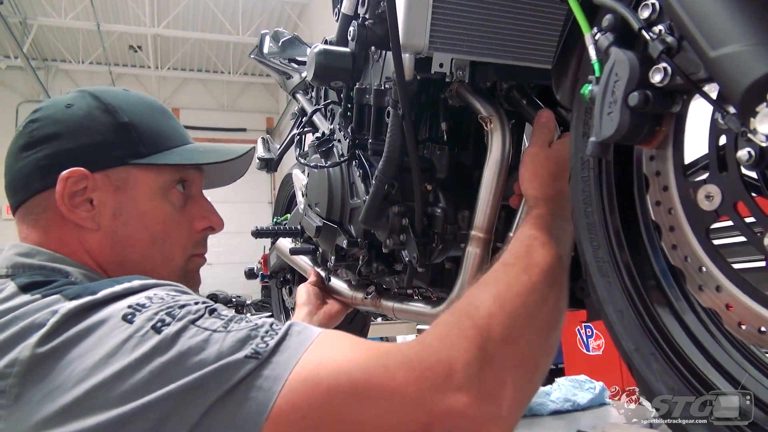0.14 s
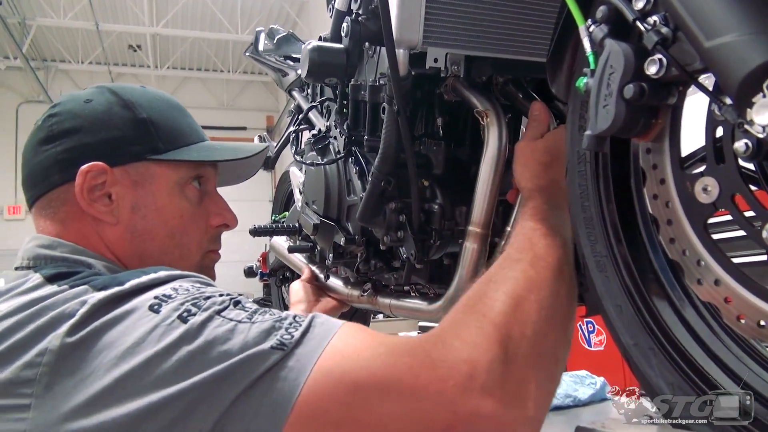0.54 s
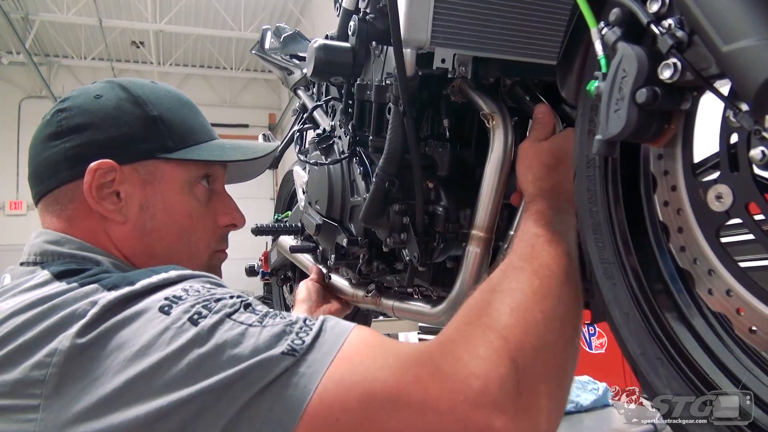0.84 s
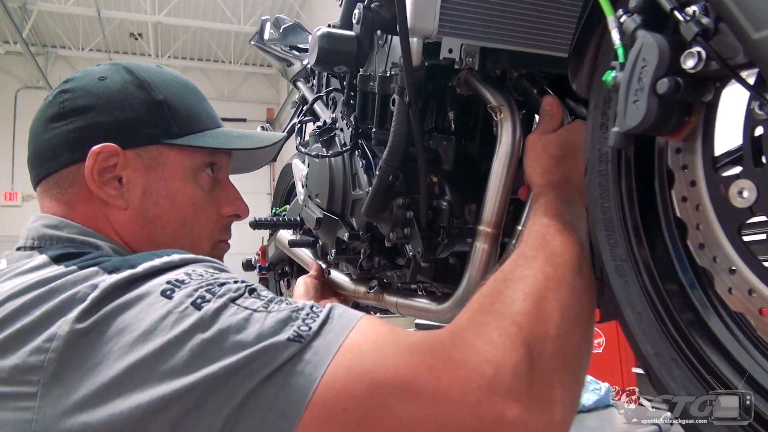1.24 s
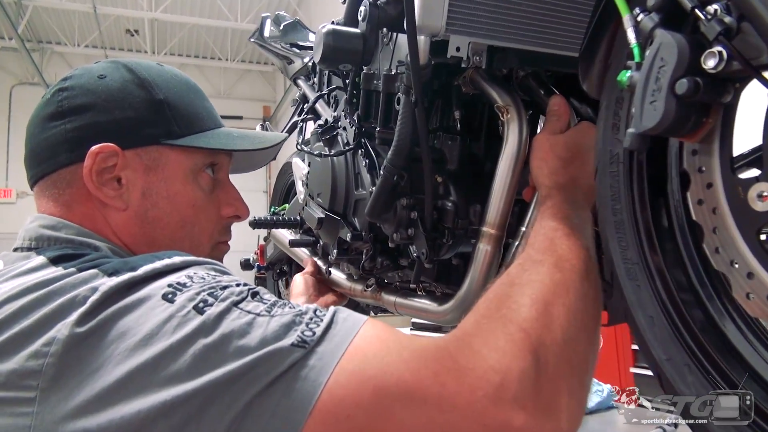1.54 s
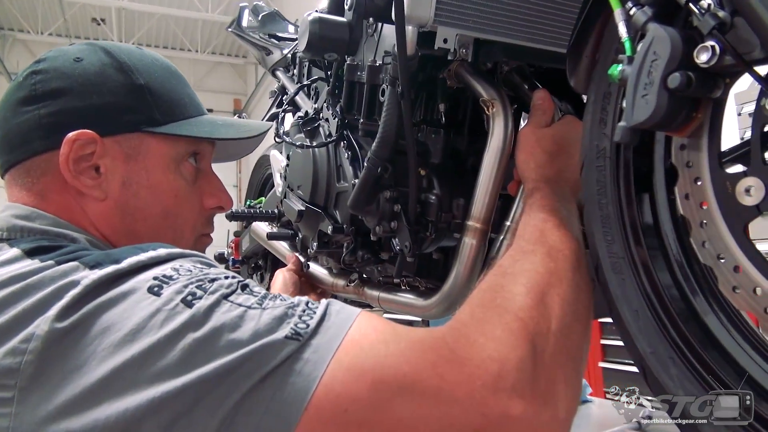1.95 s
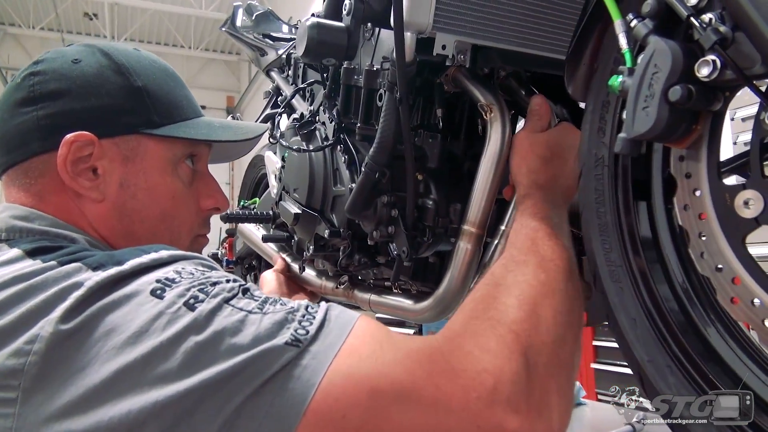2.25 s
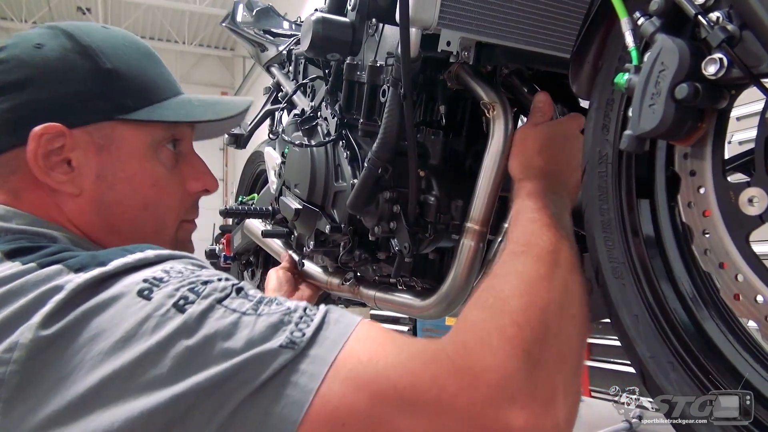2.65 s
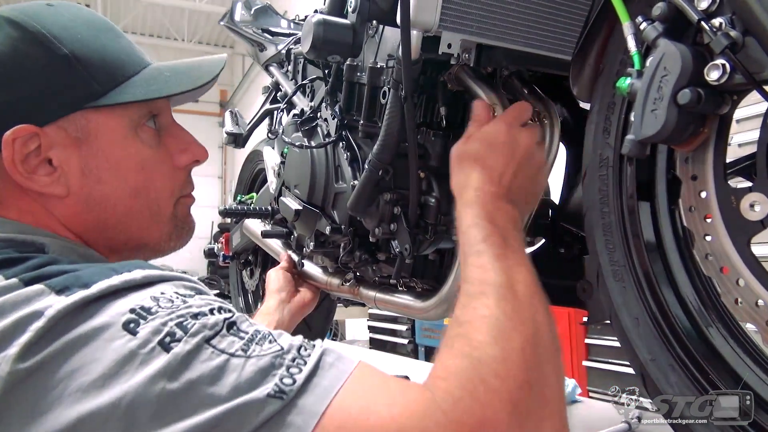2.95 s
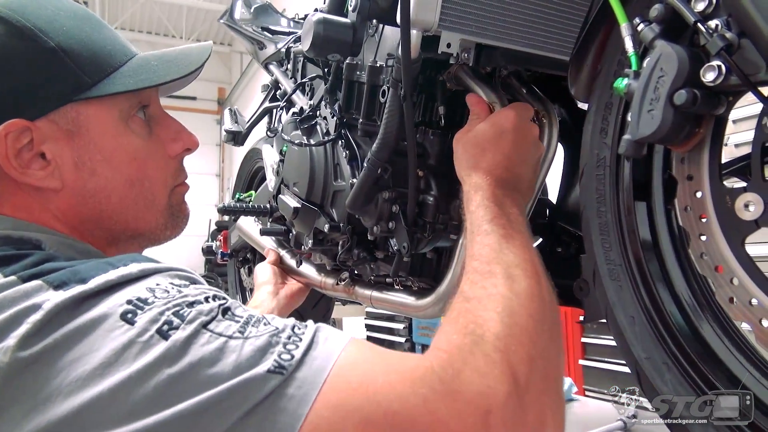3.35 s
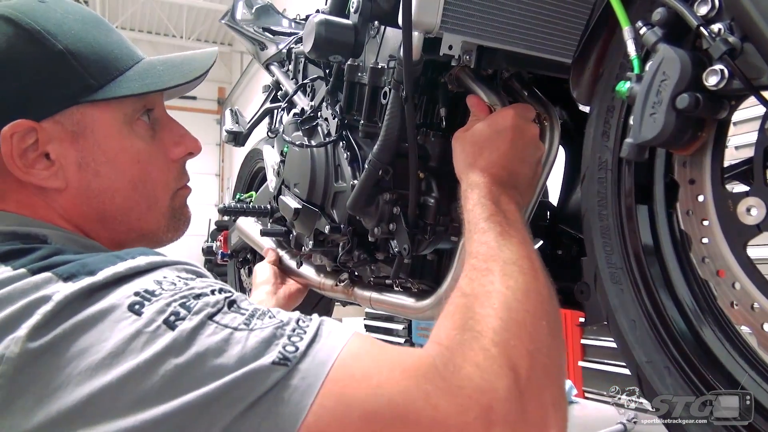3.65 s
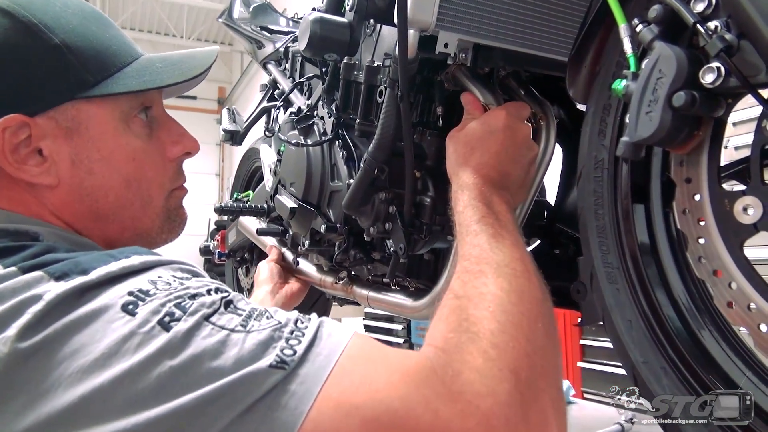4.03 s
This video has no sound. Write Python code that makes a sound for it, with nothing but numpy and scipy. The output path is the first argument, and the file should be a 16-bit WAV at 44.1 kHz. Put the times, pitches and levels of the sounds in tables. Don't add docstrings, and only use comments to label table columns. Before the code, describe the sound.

A thin steel exhaust pipe is worked by hand against a motorcycle in a large, hard workshop. Low fan hum and a broad wash of air run throughout, gradually quieter. A bright, hollow clink comes at 0.4 s, with small scuffs after it, then stronger knocks at 0.9 and 1.2 s. Each close ring is cut short by the grip, but the hall holds a shimmering tail for about a second. Around 1.65 s there is a short gritty scrape and a light tap, then a duller tap at 1.9. A sharp clank at 2.4 leaves a thin singing tone; a scuff follows at 2.6 and tiny hook clicks and spring pings near 2.75-3.0. A hard knock lands at 3.5, then faint clicks, and a soft settling tap at 4.1. The background ducks after the knocks at 1.2 and 3.5 and creeps back. Nearly mono, slightly saturated.

```python
import sys
import numpy as np
from scipy import signal
from scipy.fft import rfft, irfft
from scipy.io import wavfile
from scipy.ndimage import uniform_filter1d

SR = 44100
rng = np.random.default_rng(int(sys.argv[2]) if len(sys.argv) > 2 else 0)


def invert_db(level):
    return 10 ** (np.asarray(level, dtype=float) / 20)


def generate_wav(signal):
    frames = np.transpose(np.atleast_2d(signal))
    scaled = np.clip(frames, -1, 1) * 32767
    pcm = np.round(scaled).astype(np.int16)
    wavfile.write(sys.argv[1], SR, pcm)


N = 184635

# start in seconds, blow level in dB, treble in dB, hall level in dB,
# contact time in seconds.
FLANGE_KNOCKS = [
    (.402, -12, -1.5, -14.5, 0.002),
]
STUD_KNOCKS = [
    (.8738, -8.5, -0.085, -16, 0.00133),
]
PORT_KNOCKS = [
    (1.240, -8.5, 0.23, -14.5, 0.00178),
]
LIGHT_TAPS = [
    (1.670, -23.5, -5.5, -14.5, 0.0016),
    (1.884, -24.5, -8, -15, 0.0025),
]
SPRING_KNOCKS = [
    (2.395, -10.5, 1.9, -10.5, 0.00214),
]
BRACKET_KNOCKS = [
    (3.5349, -10.5, 0.18, -12, 0.00201),
]
SETTLING_KNOCKS = [
    (4.1278, -25.5, -5, -9.5, 0.00185),
]

# pitch in Hz, level in dB, time to fall by 60 dB in seconds.
FLANGE_MODES = [(391, -5.5, 0.0388), (533.7, -11, 0.06), (1365.2, -2.5, 0.066), (1485.5, 0.5, 0.0547),
                (1706, -2, 0.025), (2242, -30.5, .063), (2670, -16.5, .063), (2990, 0.5, 0.0336),
                (3268, 0, 0.06), (3490, -7, .03), (3982, -24.5, .063), (4823, -19, 0.058),
                (4894, -13.5, 0.066), (5400, -6.5, 0.0088)]
STUD_MODES = [(374, -7, 0.0458), (537.4, -9.5, 0.051), (1357.3, -3, 0.0754), (1456, -7, 0.097),
              (1679, 6, 0.019), (2986, 2, 0.02), (3213, -12, 0.075), (3284, -5, 0.0826), (3464, -8, 0.051),
              (3900, -10, 0.028), (5100, -14, 0.047), (5430, -31.5, .25), (5810, -9.5, 0.0135)]
PORT_MODES = [(403, -4.5, 0.0292), (508, -11, 0.053), (1372.8, -4, 0.0765), (1467.5, -8, 0.055),
              (1658, 4, 0.0182), (2680, -27.5, 0.059), (2811, -9.5, 0.045), (2964.5, -1, 0.0215),
              (3273, -3.15, 0.0596), (3435, -2.5, 0.0208), (4010, -24, 0.045), (4960, -10.5, 0.036),
              (5306, -32, 0.22), (5474, -12.5, 0.0099)]
LIGHT_MODES = [(370, -6.5, 0.05), (542.7, -6, 0.045), (1378.7, -3.5, 0.063), (1487, 0.5, 0.094),
               (1800, -16.5, 0.064), (2806, -4, 0.0435), (3012, -2.5, 0.038), (3330, -7.5, 0.035),
               (3670, -21.5, 0.059), (4920, -3.5, 0.0225), (5537, -22.5, 0.061), (5540, -21, .15)]
SPRING_MODES = [(392.2, -4.5, 0.0567), (532.2, -10, 0.0347), (1417.3, 1.5, 0.044), (1764, -10.5, 0.042),
                (2046, -24, 0.073), (2633, -4, 0.0725), (2943, -1.5, 0.049), (2921, -0.5, 0.054),
                (3380, 6, 0.0098), (3905, -9, 0.0417), (4312, -18, 0.14), (4811, -7.5, 0.0265),
                (5643, -10, 0.0172), (6620, -9.5, 0.022)]
BRACKET_MODES = [(414, -10.5, 0.038), (525.6, -10, 0.045), (1395.7, -6, 0.057), (1500, -2.5, 0.0362),
                 (2016, -15, 0.037), (2790, -5, 0.035), (2970, -6.5, 0.057), (3357, -8.5, 0.0363),
                 (3600, -2.5, 0.0152), (4724, -19.5, 0.168), (5190, -23, 0.069), (5605, -15.5, 0.036)]
SETTLING_MODES = [(397.7, -5.5, 0.099), (550, -13.5, 0.108), (1422, 3.5, 0.0447), (1753, -3.5, 0.031),
                  (2069, -19.5, 0.24), (2654, 1.5, 0.042), (2840, -10.5, 0.18), (3245, -7.5, 0.055),
                  (4177, -20.5, 0.065), (4285, -7, 0.012), (4678, -31, 0.24), (4877, -24.5, 0.17),
                  (5675, -16, 0.081)]

# pitch in Hz, level in dB, time to fall by 60 dB in seconds.
HEADER_HIGH = [(6516, -26.5, 0.021), (7445, -18, 0.059), (7472, -8.5, 0.0214), (8385, -25.5, 0.059),
               (8600, -27, 0.057), (8640, -24.5, 0.033), (9520, -16.5, .035), (10800, -26, 0.034),
               (11550, -19, 0.0264), (12460, -19, 0.036), (13450, -32, 0.016), (13760, -13, 0.0155),
               (15100, -30.5, .03)]
PORT_HIGH = [(6842, -24.5, 0.042), (7370, 1.5, 0.0195), (8560, -23.5, 0.056), (9660, -13, 0.049),
             (10300, -28.5, 0.039), (10840, -18, 0.05), (11270, -18.5, 0.05), (12000, -23, 0.058),
             (12440, -30, 0.066), (12940, -35, 0.087), (13400, -15, 0.027), (13880, -28, 0.056),
             (14580, -19.5, 0.025)]
SPRING_HIGH = [(7350, -18.5, 0.21), (7580, -10.5, 0.077), (7987, -7.5, 0.048), (8153, -4, 0.057),
               (8527, -9, 0.095), (8750, -0.5, 0.0215), (9480, -13.5, 0.11), (9884, -16.5, 0.051),
               (10630, -19, 0.096), (11560, -20.5, 0.12), (12200, -11, 0.1), (12500, -14.5, 0.038),
               (13100, -5, 0.045)]
BRACKET_HIGH = [(6040, -20, 0.048), (6295, -11, 0.026), (7079, -29.5, 0.065), (7470, -11, 0.036),
                (8285, -22, 0.064), (8490, -13, 0.05), (9700, -7.5, 0.034), (10070, -21.5, 0.041),
                (10820, -20.5, 0.044), (11600, 1.5, 0.0109), (11800, -13.5, 0.048), (13230, -16.5, 0.045),
                (14570, -27.5, 0.069)]
JOINT_HIGH = [(6840, -22.5, 0.036), (7410, -9, 0.0253), (8250, -21.5, 0.069), (8540, -25, 0.044),
              (8772, -13.5, 0.0098), (9540, -21, 0.052), (9590, -15.5, 0.016), (10600, -22, 0.042),
              (11440, -9, 0.0126), (12240, -14, .035), (12800, -18, 0.042), (14450, -30, .03)]

# pitch in Hz, width in Hz, level in dB.
FLANGE_FAR = [(378, 78, -3), (522, 60, -7.5), (1400, 60, -6), (1490, 60, -4), (1717, 253, -13),
              (2630, 34, -16.5), (2898, 130, -2.5), (3296, 238, -6), (3757, 97, -14), (4030, 117, -20),
              (4430, 41, -20.5), (4838, 49, -5.5), (5020, 195, -17), (5388, 37, -12.5), (7380, 95, -24.5)]
STUD_FAR = [(390, 86, -8), (561, 107, -10), (1356, 87, -6.5), (1501, 42, -1.5), (1676, 78, -7.5),
            (1845, 33, -12.5), (2856, 112.5, -2.2), (3260, 280, -6), (3723, 73, -15.5), (3977, 107, -14),
            (4300, 44, -22), (4852, 186, -13), (5462, 45, -15.5), (7377, 96, -19.5)]
PORT_FAR = [(408, 93, -10.5), (556, 54, -11.5), (1378.4, 53.4, -2), (1500.7, 37.3, -3.5),
            (1666, 245, -14.5), (2908, 125, -2.5), (3250, 190, -12.5), (3364, 225, -8), (3943, 163, -15),
            (4390, 51, -30), (4928, 159, -13.5), (5500, 200, -22), (5990, 97, -26.5), (7416, 92, -24.5)]
LIGHT_FAR = [(404, 167, -7.5), (557, 60, -9), (1370, 78, -6), (1500, 87, -3), (1700, 220, -13.5),
             (2471, 31.6, -7), (2752, 99, -2.5), (2935, 113, -2.5), (3276, 232, -10), (3790, 140, -18.5),
             (4786, 174, -9.5), (5540, 31, -7)]
SPRING_FAR = [(407.5, 111, -8), (1432, 246, -10), (1600, 31, -15), (2667, 67.5, -2.5), (2815, 71.3, 0),
              (3245, 30, -8), (3178, 350, -16), (3754, 270, -16.5), (4193, 47.4, -11.5), (4710, 24, -18),
              (4826, 178, -20), (5600, 183, -23), (6000, 39, -26), (8533, 48, -38)]
BRACKET_FAR = [(409.5, 70, -7.5), (537.3, 50, -8), (1400.5, 27.8, -3.5), (1551.4, 143, -5),
               (2907, 155.3, -2.15), (3389, 97, -8.5), (3792, 210, -16), (4353, 88, -23.5),
               (4689, 43.6, -12), (5000, 155, -17.9), (5588, 37.5, -13.5), (5720, 34, -19.5),
               (7371, 46, -28.5), (7587, 88, -28.5)]

# pitch in Hz, width in Hz, level in dB.
HEADER_HIGH_FAR = [(5900, 192, -25), (6420, 113, -28.5), (7680, 210, -27), (8450, 136, -30),
                   (9480, 79, -29), (10750, 102, -30.5), (11960, 87, -29.5), (12380, 250, -35),
                   (13500, 250, -38), (14800, 110, -42)]
PORT_HIGH_FAR = [(6480, 37, -1), (6870, 41, -11), (7430, 140, -3), (7840, 184, -10), (8380, 53, -5.5),
                 (9480, 65, -6.5), (10850, 67, -8), (11500, 52, -6.5), (12100, 81, -12), (12400, 300, -12),
                 (13400, 38, -14.5), (13900, 160, -15.5), (14560, 140, -14)]
SPRING_HIGH_FAR = [(6585, 130, -2), (7050, 46, -8), (7370, 82, 0), (8270, 48, 2), (8450, 28, -1.5),
                   (8900, 38, -7.5), (9470, 31, 0.5), (10600, 74, -14), (10900, 100, -13.5),
                   (11500, 70, -12), (12200, 42, -5), (13200, 69, -14), (14600, 34, -16.5)]
BRACKET_HIGH_FAR = [(6530, 97, -4), (7050, 87, -9.5), (7400, 46, -3.5), (7620, 52, -2), (8310, 41, -8),
                    (8440, 56, 1.5), (9470, 51, -4), (10030, 72, -11.5), (10800, 59, -7), (11500, 85, -8.5),
                    (12270, 320, -8.5), (13200, 58, -8.5), (14500, 55, -16)]
# pitch in Hz, width in Hz, level in dB.
HAZE = [(7500, 4000, -42), (11500, 4000, -45)]

# pitch in Hz, level in dB.
BETWEEN = [(120, -15.5), (250, -13.5), (700, -26.5), (2100, -24.5), (4300, -39), (9000, -38.5),
           (12000, -49), (15500, -60.5)]
# pitch in Hz, level in dB.
CRACK = [(100, -25.5), (250, -20), (900, -24), (2000, -21), (4000, -26), (8000, -32.5), (15000, -42),
         (16500, -65)]
# pitch in Hz, time to fall by 60 dB in seconds.
HALL_T60 = [(200, 0.82), (500, 0.95), (1400, 1.317), (3000, 1.395), (6000, 1.188), (10000, 0.763),
            (15000, 0.45)]

# pitch in Hz, level in dB per Hz.
WASH = [(12, -32), (24, -2), (102, -8), (342, -17), (1390, -22.5), (1700, -28.5), (3500, -26),
        (4930, -37.5)]
# pitch in Hz, width in Hz, level in dB over the wash.
HUM = [(60.22, 9, -4), (100.76, 8.2, 0), (128.45, 28.3, -7)]
# time in seconds, level in dB.
WASH_DB = [(0, -43), (.9, -42.5), (1.05, -45), (2.3, -47.5), (3.5, -46.5), (4.19, -49.5)]
# start in seconds, depth in dB.
DUCKS = [
    (1.25, 11.5),
    (3.545, 13.5),
]
# pitch in Hz, level in dB.
TRACK_HISS = [(100, -8), (600, -0.5), (1200, -8), (3500, -9.5), (6000, -0.5)]

# start in seconds, peak level in dB, pitch in Hz,
# width in Hz, length in seconds.
SCUFFS = [(.372, -37.5, 1500, 850, 0.0063), (.575, -32, 420, 300, 0.013), (.946, -29, 1680, 120, .014),
          (.965, -28.5, 451, 298, 0.0137), (1.65, -13.5, 1700, 2550, .00086),
          (1.651, -22.5, 3050, 2500, 0.0141), (1.89, -35.5, 232, 120, 0.05),
          (2.137, -42.5, 1187, 90, .0041), (2.364, -36.5, 1110, 900, 0.0183),
          (2.3733, -26, 1190, 1500, 0.0138), (2.374, -33, 3600, 2500, 0.0055),
          (2.641, -26, 1392, 300, 0.0092), (2.642, -40, 800, 500, 0.0152), (2.644, -40, 2300, 1200, 0.0053),
          (3.276, -45, 3270, 300, 0.0062), (3.287, -39, 1623, 150, 0.0042), (3.502, -42, 3600, 900, 0.0136)]
# start in seconds,
# level in dB, pitch in Hz, time to fall by 60 dB in seconds.
SINGING = [(.402, -42, 1490, .9), (.402, -56, 7430, .8), (.874, -40, 1490, .9), (.874, -54, 7410, .8),
           (1.24, -40, 1378, .9), (1.24, -44, 1520, 1.1), (1.24, -48, 7435, .9), (1.24, -55, 9480, .6),
           (2.395, -35, 3243, 1.7), (2.395, -44, 2790, 1.1), (2.395, -55, 8270, .7), (2.395, -57, 9470, .7),
           (3.535, -42, 1545, 1.1), (3.535, -42, 2920, 1.1), (3.535, -54, 8440, .9)]
# start in seconds, peak level in dB, pitch in Hz.
CLICKS = [(.587, -45, 13000), (.62, -42.5, 12000), (1.652, -21.5, 6900), (1.76, -58, 7000),
          (2.912, -52, 9000), (2.923, -50.5, 7000), (2.93, -54, 11000), (2.975, -57, 12000),
          (3.195, -46.5, 8000), (3.797, -51, 9000), (3.903, -53.5, 11000)]
# pitch in Hz, width in Hz, level in dB.
SCRAPE_MODES = [(430, 98, -4), (1130, 300, -8), (1680, 166, -2.5)]
# start in seconds, peak level in dB, pitch in Hz,
# ring time in seconds.
PINGS = [(2.755, -54.5, 8700, 0.032), (2.842, -51.5, 8900, 0.043), (2.851, -60.5, 9150, .03),
         (2.862, -62, 9200, .02), (2.923, -51.5, 7930, 0.074), (2.923, -52, 6130, .07),
         (2.927, -53.5, 9160, 0.054), (2.923, -55, 15400, 0.061), (2.957, -55.5, 8000, 0.061),
         (2.968, -57, 7950, 0.041), (2.97, -59, 14900, .04), (2.972, -60, 10900, 0.031)]

EDGE_HZ = 15760
BODY_DB = -3
HISS_DB, PATCHY_DB = -42.5, 1.4
DUCK_FALL_S, DUCK_RECOVER_S = 0.016, 0.321
WAVER_HZ, WAVER = 9, 0.5
CLICK_WIDTH, CLICK_S = 0.774, 0.00286
SCRAPE_S, SCRAPE_LENGTH_S, SCRAPE_DB, SLIPS_PER_S = 1.627, 0.04, -21, 2300
OVERLOAD = 0.986
TRACK_HISS_DB = -71


def evened(x):
    return x / np.sqrt(np.mean(x ** 2) + 1e-20)


def read(points, hz):
    f, value = np.transpose(points)
    return np.interp(np.log(hz + 1), np.log(f + 1), value)


def add(mix, s, sound):
    part = mix[round(s * SR):][:len(sound)]
    part += sound[:len(part)]


def resonate(x, hz, width):
    pole = np.exp((2j * np.pi * hz - np.pi * width) / SR)
    return 2 * signal.lfilter([1 - abs(pole)], [1, -pole], x).real


def resonate_twice(x, hz, width):
    return resonate(resonate(x, hz, width), hz, width)


def coloured(x, points):
    return irfft(rfft(x) * invert_db(read(points, np.fft.rfftfreq(len(x), 1 / SR))), len(x))


def burst(length_s, size=12000):
    u = np.arange(size) / SR / max(length_s, 1e-3)
    swell = u * np.exp(1 - u) ** 2 * np.exp(-(u / 2.27) ** 2)
    return rng.standard_normal(size) * swell


def lifted(table, db, column):
    return [tuple(v + db * (k == column) for k, v in enumerate(row)) for row in table]


def ducking_db():
    start_s, depth_db = np.transpose(DUCKS)
    after = np.maximum(np.arange(N) / SR - start_s[:, None], 0)
    return -depth_db @ ((1 - np.exp(-after / DUCK_FALL_S)) * np.exp(-after / DUCK_RECOVER_S))


def air_wash():
    frames, hz = N // 512 + 5, np.fft.rfftfreq(2048, 1 / SR)
    a, b, patches = rng.standard_normal((frames, 1025, 3)).T
    patches = uniform_filter1d(patches, 20, 0)
    patches = evened(uniform_filter1d(patches, 6, 1))
    air_db = read(WASH, hz) - 6 * np.log2(np.maximum(hz / 5000, 1))
    level_db = np.maximum(air_db, HISS_DB)[:, None] + PATCHY_DB * patches
    spectrum = (a + 1j * b) * (hz < EDGE_HZ)[:, None] * invert_db(level_db)
    air = signal.istft(spectrum, nperseg=2048, noverlap=1536)[1]
    return evened(air[:N])


def fan_hum():
    return sum(invert_db(db) * evened(resonate_twice(rng.standard_normal(N), hz, width))
               for hz, width, db in HUM)


def background():
    gain_db = np.interp(np.arange(N) / SR, *np.transpose(WASH_DB)) + ducking_db()
    return invert_db(gain_db) * (air_wash() + fan_hum())


def scuff(db, hz, width, length_s):
    sound = resonate_twice(burst(0.5 * length_s), hz, width)
    return invert_db(db) * sound / abs(sound).max()


def blow_tilt(treble_db):
    return [(600, BODY_DB), (900, 0.0097), (4000, 0), (5000, treble_db)]


def wall_ring(modes, tilt, contact_s):
    t = np.arange(12000) / SR
    ring = np.zeros(len(t))
    for k, (hz, db, t60) in enumerate(modes):
        turns = hz * t + 0.5 * k + 0.2 * rng.random()
        ring += invert_db(db + read(tilt, hz) - 60 * t / (1.067 * t60)) * np.sin(2 * np.pi * turns)
    ring *= 1 - np.exp(-(t / max(contact_s, 2e-4)) ** 2)
    ring *= 0.734 + np.exp(-(t / 0.0207) ** 2)
    return ring * np.cos(np.linspace(0, np.pi / 2, len(t))) ** 2


def clink(row, modes):
    _, blow_db, treble_db, _, contact_s = row
    tilt = blow_tilt(treble_db)
    dull = [(5000, 0), (14000, 0.8 * (blow_db + 10))]
    ring = wall_ring(modes, tilt, contact_s)
    crack_curve = [(hz, db + read(tilt, hz) + read(dull, hz)) for hz, db in CRACK]
    crack = coloured(burst(6.65 * contact_s), crack_curve)
    crack = coloured(crack, [(EDGE_HZ - 300, 0), (EDGE_HZ, -30)])
    snap_curve = [(5000, -55.5), (9000, -34 + read(tilt + dull[1:], 8800)),
                  (15500, -36 + read(dull, 15500)), (17000, -61.5)]
    snap = coloured(burst(3 * contact_s), snap_curve)
    sound = ring + invert_db(15.0) * crack + invert_db(17.5) * snap
    return invert_db(blow_db) * sound / sound[:500].std()


def sent_to_hall(row, far):
    _, blow_db, treble_db, hall_db, _ = row
    f = np.fft.rfftfreq(2 * SR, 1 / SR)
    power = sum(invert_db(2 * db) / (1 + (1.3 * (f - hz) / width) ** 2) ** 2 for hz, width, db in far)
    power = power * invert_db(2 * read([(9000, 0), (13000, -3)], f))
    power = (power + invert_db(2 * read(BETWEEN, f))) * (f < EDGE_HZ)
    early_db = 60 * 0.16 / read(HALL_T60, f)
    level_db = blow_db + hall_db + 30 + early_db + read(blow_tilt(treble_db), f)
    return invert_db(level_db) * power ** 0.5


def hall(spectrum):
    noise = irfft(rfft(rng.standard_normal(2 * SR)) * spectrum)
    hz, t, z = signal.stft(noise, SR, nperseg=256)
    fade = invert_db(-60 * t / read(HALL_T60, hz)[:, None])
    tail = signal.istft(z * fade, SR, nperseg=256)[1]
    t = np.arange(len(tail)) / SR
    swell = 1 - np.exp(-(t / 0.00156) ** 2)
    near_walls = 1 + 0.294 * np.exp(-t / 0.167)
    return 0.06935 * tail * swell * near_walls


def knocks():
    header_far = HEADER_HIGH_FAR + HAZE
    port_far = lifted(PORT_HIGH_FAR, -22, column=2) + HAZE
    spring_far = lifted(SPRING_HIGH_FAR, -25.5, column=2) + HAZE
    bracket_far = lifted(BRACKET_HIGH_FAR, -25, column=2) + HAZE
    port_high = lifted(PORT_HIGH, -9.5, column=1)
    spring_high = lifted(SPRING_HIGH, -15.5, column=1)
    bracket_high = lifted(BRACKET_HIGH, -11.5, column=1)
    mounts = [
        (FLANGE_KNOCKS, FLANGE_MODES + HEADER_HIGH, FLANGE_FAR + header_far),
        (STUD_KNOCKS, STUD_MODES + HEADER_HIGH, STUD_FAR + header_far),
        (PORT_KNOCKS, PORT_MODES + port_high, PORT_FAR + port_far),
        (LIGHT_TAPS, LIGHT_MODES + HEADER_HIGH, LIGHT_FAR + header_far),
        (SPRING_KNOCKS, SPRING_MODES + spring_high, SPRING_FAR + spring_far),
        (BRACKET_KNOCKS, BRACKET_MODES + bracket_high, BRACKET_FAR + bracket_far),
        (SETTLING_KNOCKS, SETTLING_MODES + JOINT_HIGH, BRACKET_FAR + bracket_far)]
    out = np.zeros(N)
    for rows, modes, far in mounts:
        for row in rows:
            add(out, row[0], clink(row, modes))
            add(out, row[0], hall(sent_to_hall(row, far)))
    return out


def singing():
    out, t = np.zeros(N), np.arange(SR) / SR
    for s, db, hz, t60 in SINGING:
        u, v = rng.random(2)
        second_hz = hz + WAVER_HZ * (0.4 + u)
        pair = np.sin(2 * np.pi * hz * t) + WAVER * np.sin(2 * np.pi * (second_hz * t + v))
        add(out, s, invert_db(db - 60 * t / t60) * np.minimum(t / 0.02, 1) * (1 - t) * pair)
    return out


def scrape():
    u = np.arange(4000) / SR / SCRAPE_LENGTH_S
    draw = rng.random((4000, 2))
    slips = (draw[:, 0] < SLIPS_PER_S / SR) * (2 * draw[:, 1] - 1)
    slips = slips * np.minimum(2 * u, 1) * (u < 1)
    sound = sum(invert_db(db) * evened(resonate_twice(slips, hz, width)) for hz, width, db in SCRAPE_MODES)
    return invert_db(SCRAPE_DB) * sound / abs(sound).max()


def ping(db, hz, ring_s):
    t = np.arange(6000) / SR
    return invert_db(db - 60 * t / ring_s) * np.minimum(t / 0.00176, 1) * np.sin(2 * np.pi * hz * t)


def small_sounds():
    out = np.zeros(N)
    for s, db, hz, width, length_s in SCUFFS:
        add(out, s, scuff(db, hz, width, length_s))
    for s, db, hz in CLICKS:
        add(out, s, scuff(db, hz, CLICK_WIDTH * hz, CLICK_S))
    add(out, SCRAPE_S, scrape())
    for s, db, hz, ring_s in PINGS:
        add(out, s, ping(db, hz, ring_s))
    return out + invert_db(-22.0) * signal.fftconvolve(out, hall(1.0))[:N]


def scene():
    return np.tile(background() + small_sounds() + knocks() + singing(), (2, 1))


def roll_off(x):
    return signal.sosfilt(signal.butter(12, 16780, fs=SR, output="sos"), x)


def record(dry):
    soft = np.tanh(dry[0] / OVERLOAD) * OVERLOAD
    soft = coloured(soft, [(EDGE_HZ - 200, 0), (EDGE_HZ + 100, -22), (16780, -30), (16950, -70)])
    hiss = coloured(rng.standard_normal(N), TRACK_HISS + [(EDGE_HZ - 100, 0), (EDGE_HZ, -60)])
    side = invert_db(TRACK_HISS_DB + 0.5 * ducking_db()) * evened(hiss)
    return roll_off(soft + np.array([side, -side]))


dry = scene()
out = record(dry)
generate_wav(out)
```